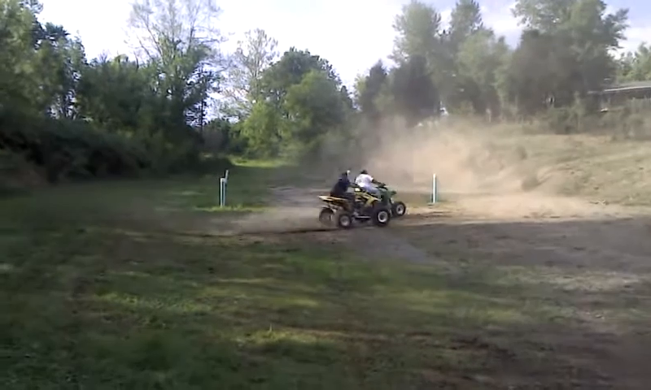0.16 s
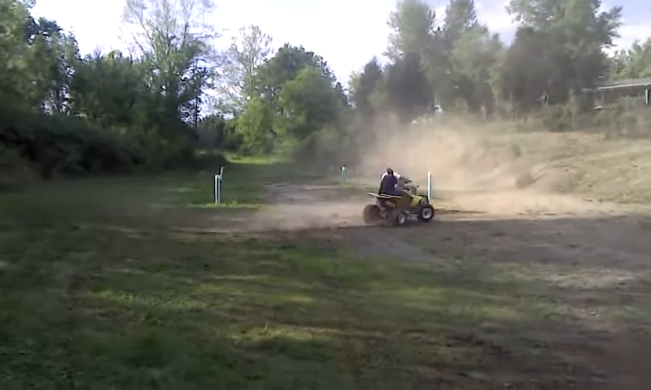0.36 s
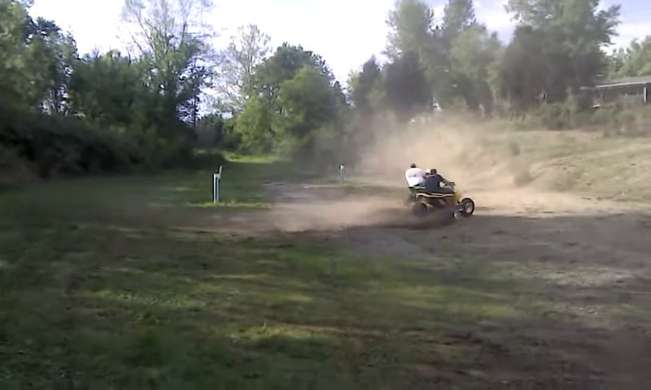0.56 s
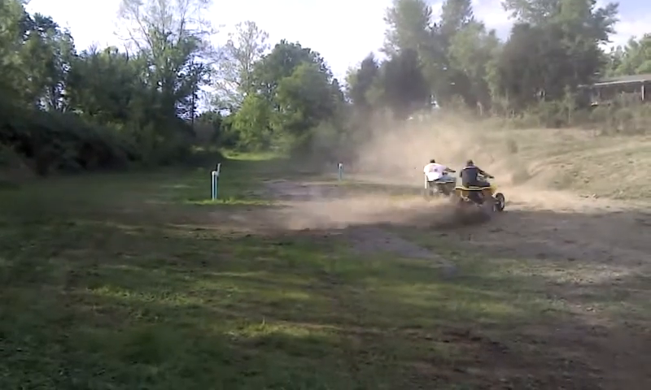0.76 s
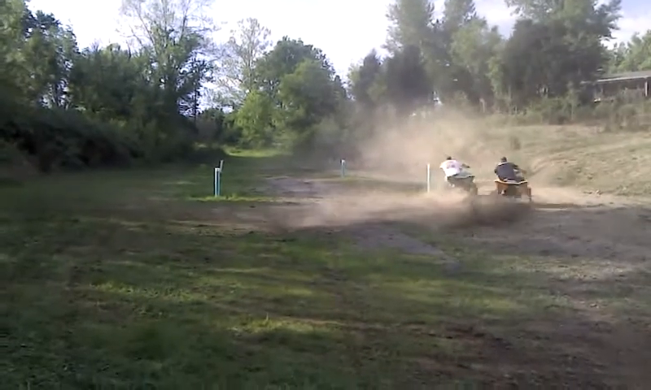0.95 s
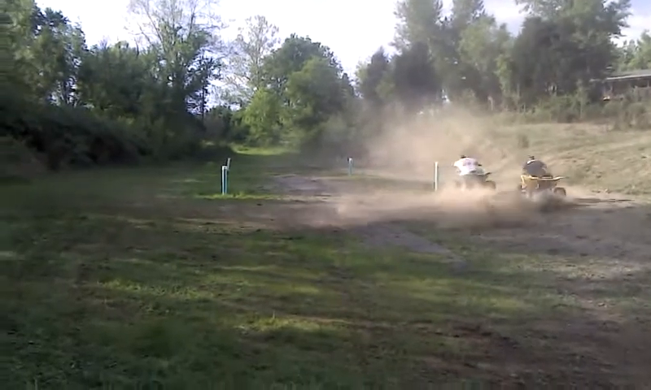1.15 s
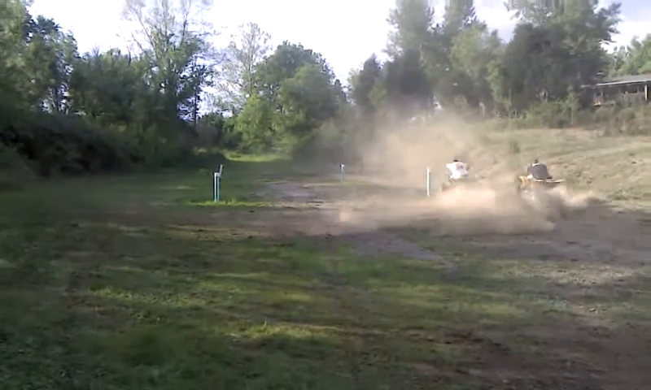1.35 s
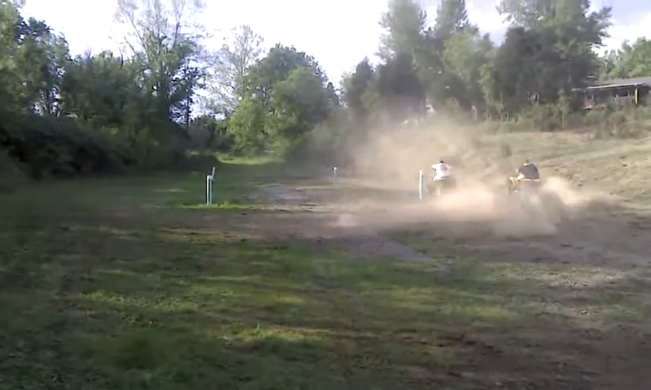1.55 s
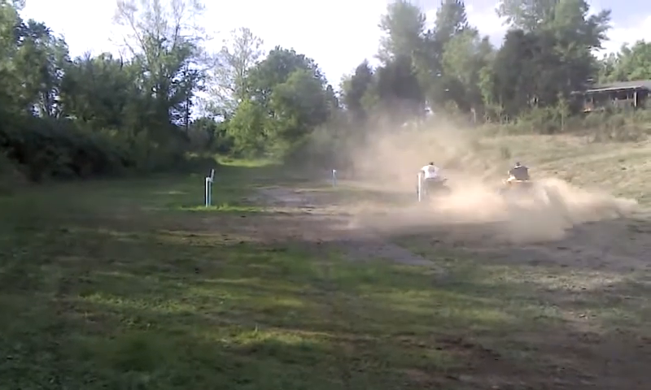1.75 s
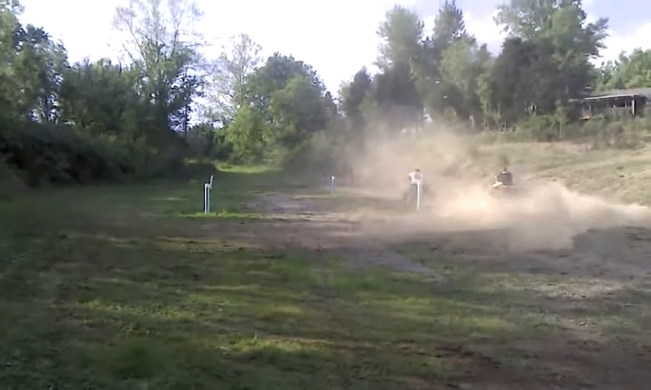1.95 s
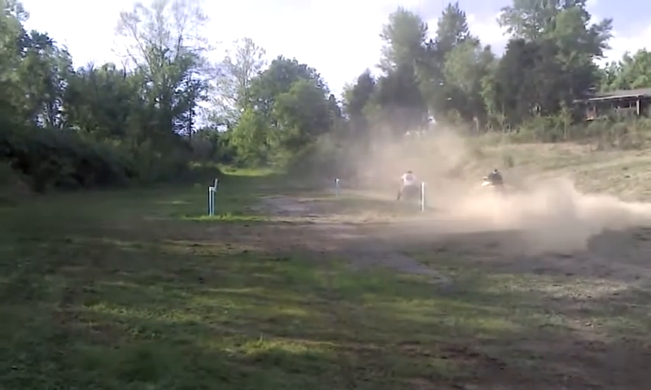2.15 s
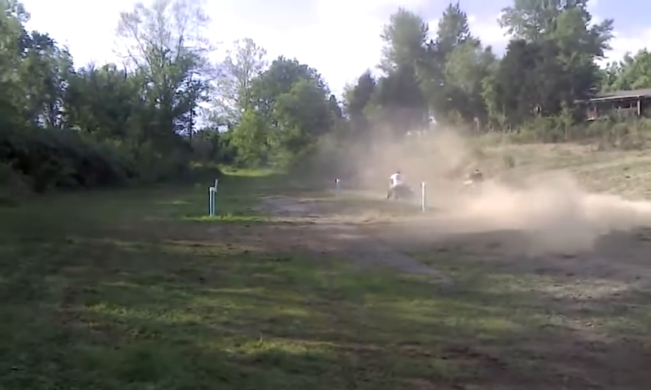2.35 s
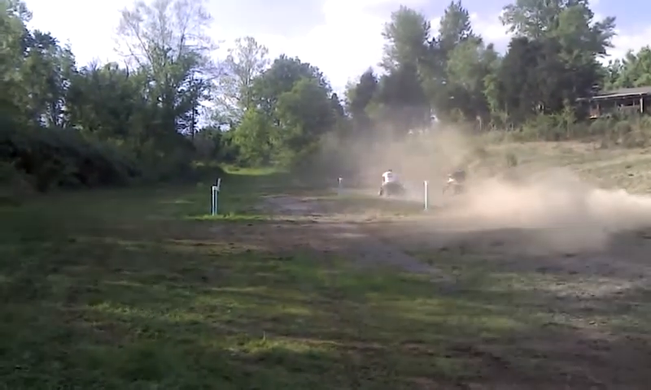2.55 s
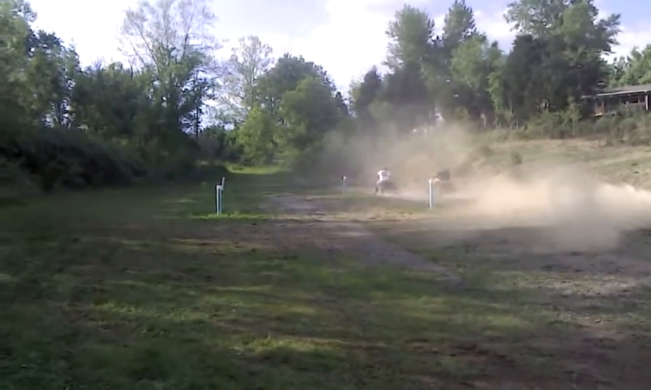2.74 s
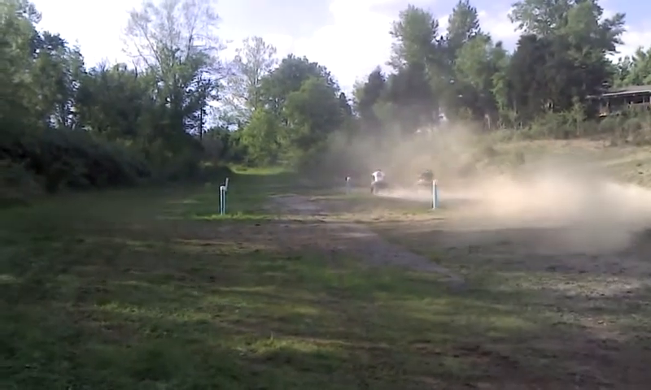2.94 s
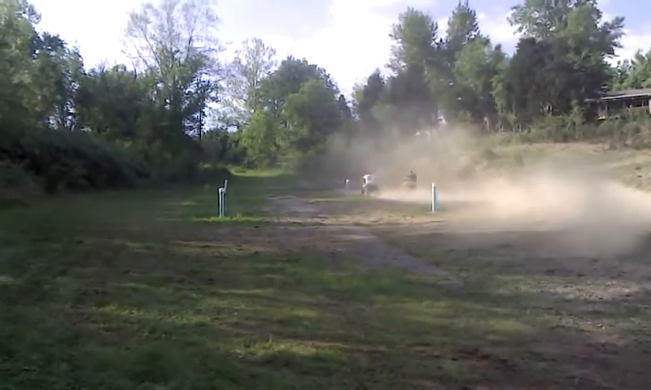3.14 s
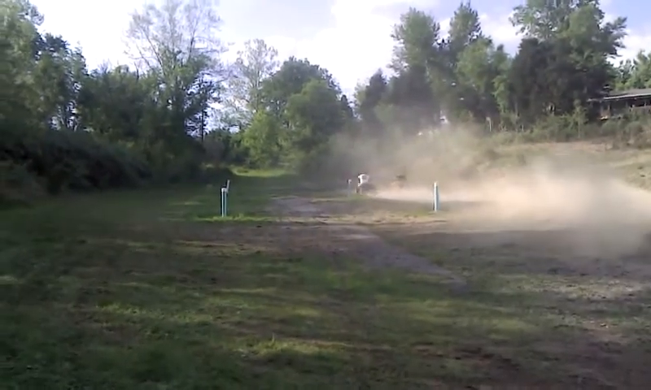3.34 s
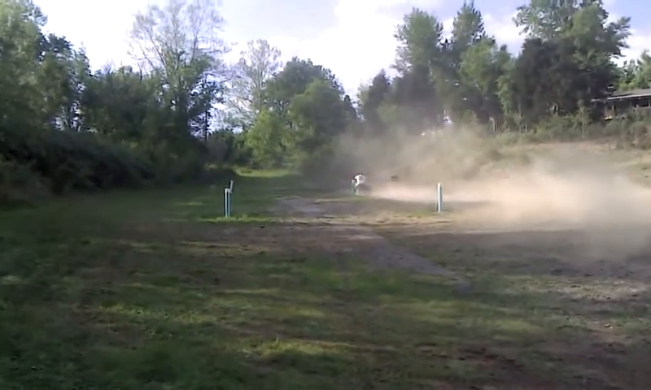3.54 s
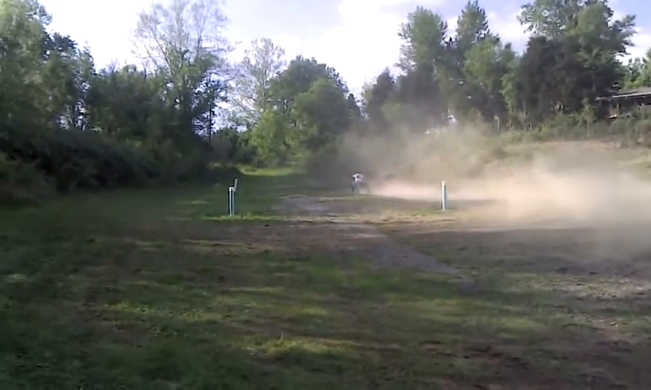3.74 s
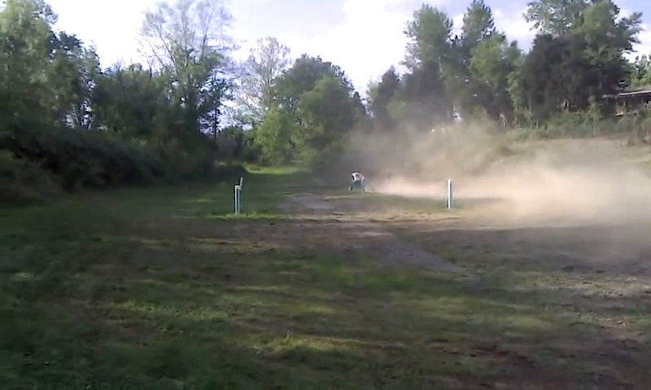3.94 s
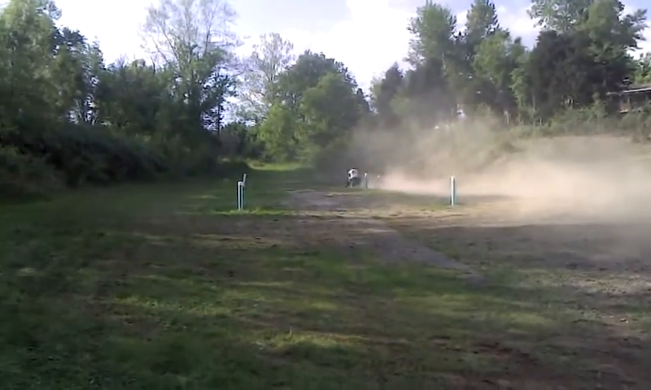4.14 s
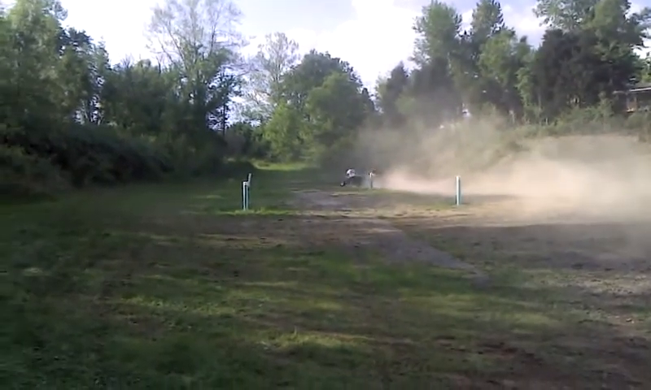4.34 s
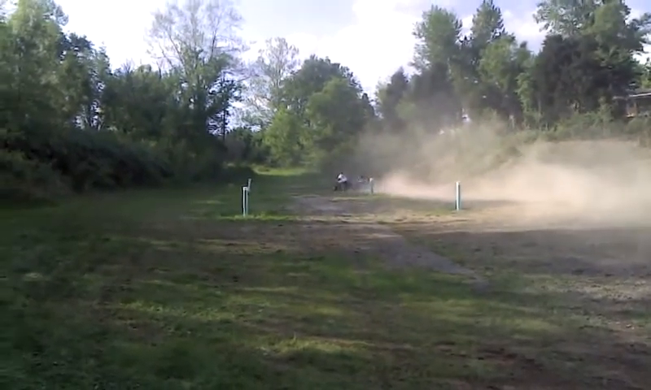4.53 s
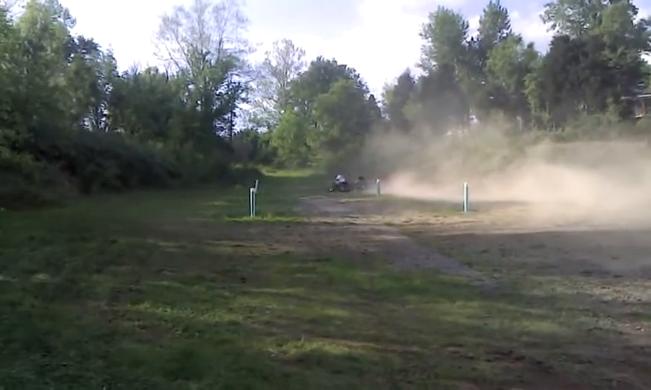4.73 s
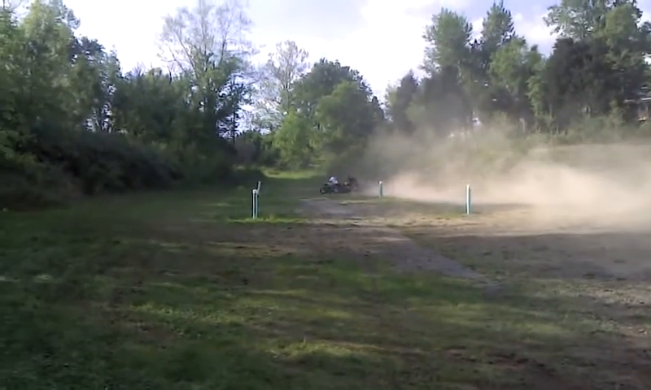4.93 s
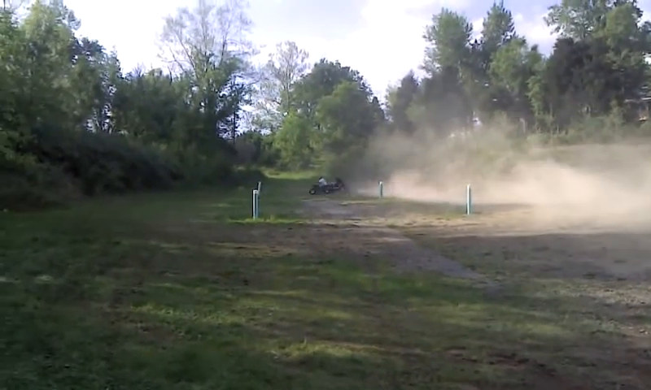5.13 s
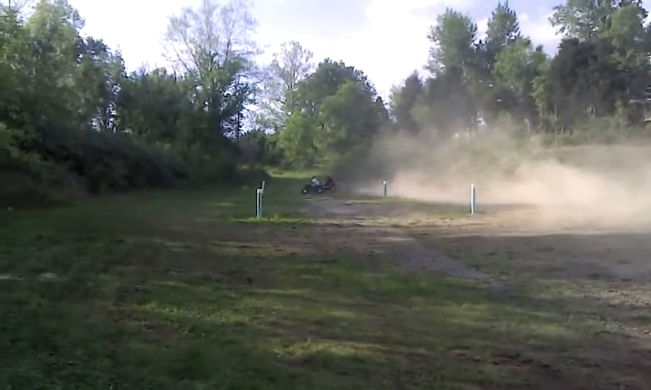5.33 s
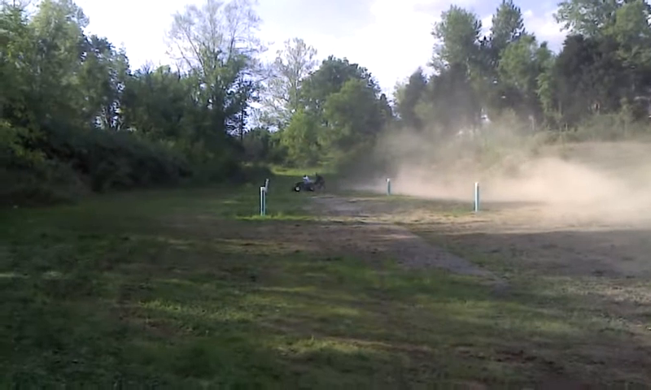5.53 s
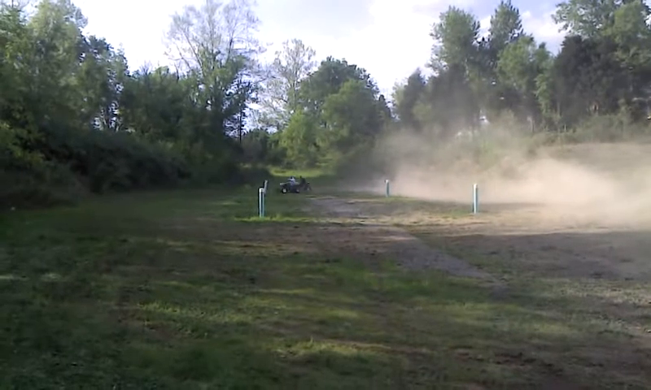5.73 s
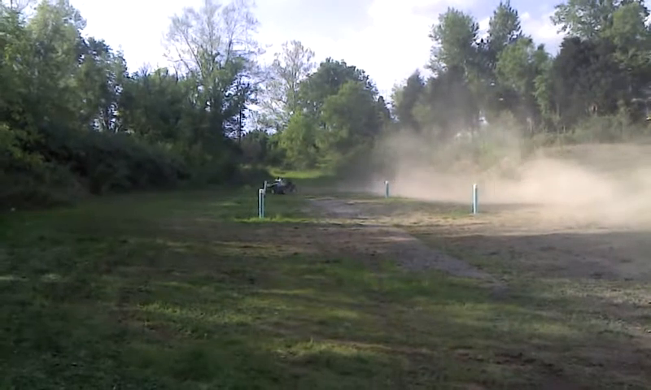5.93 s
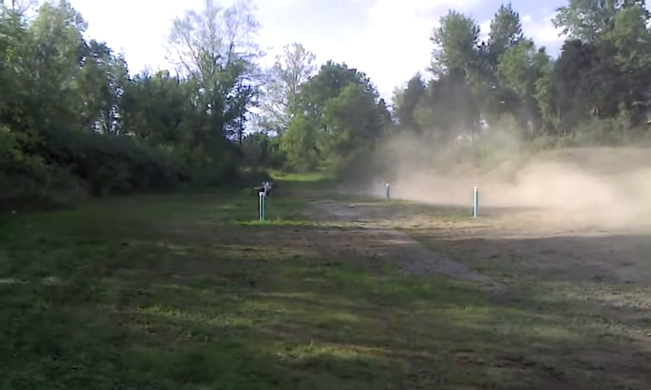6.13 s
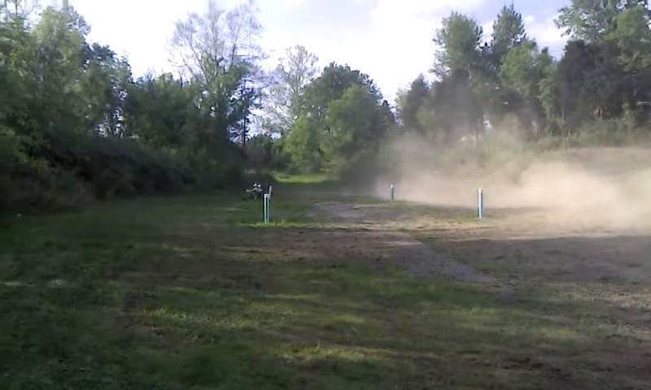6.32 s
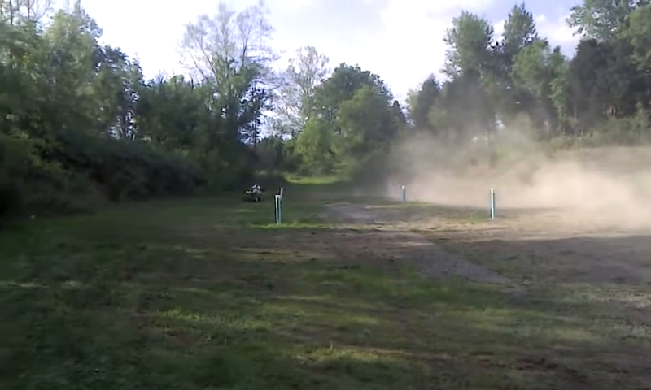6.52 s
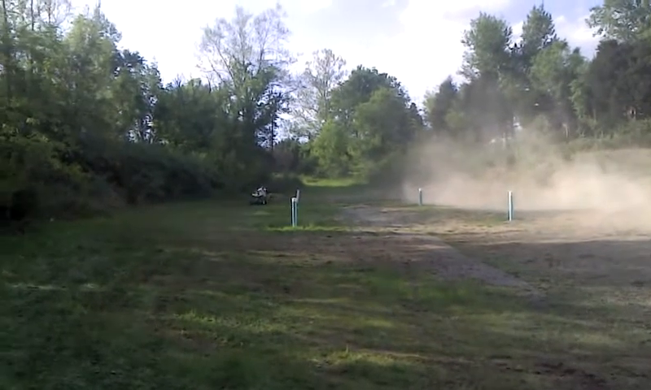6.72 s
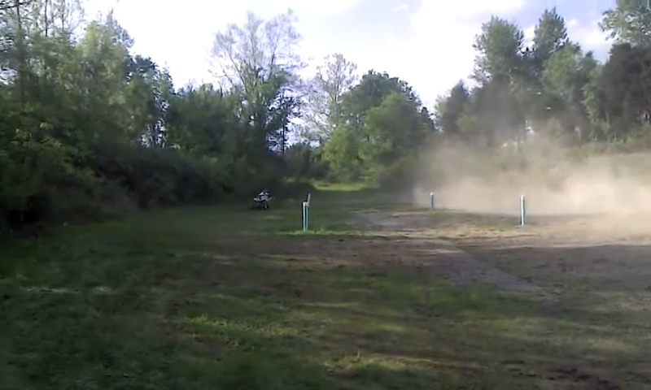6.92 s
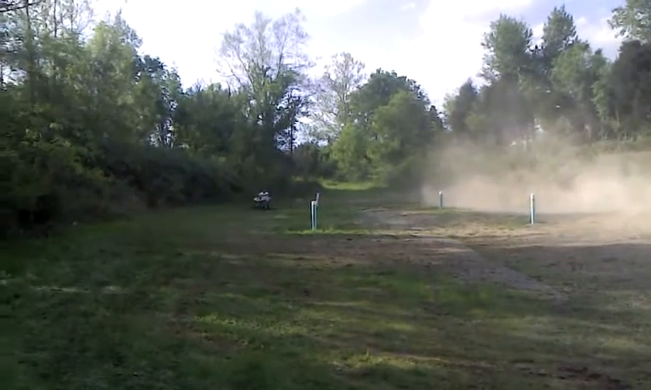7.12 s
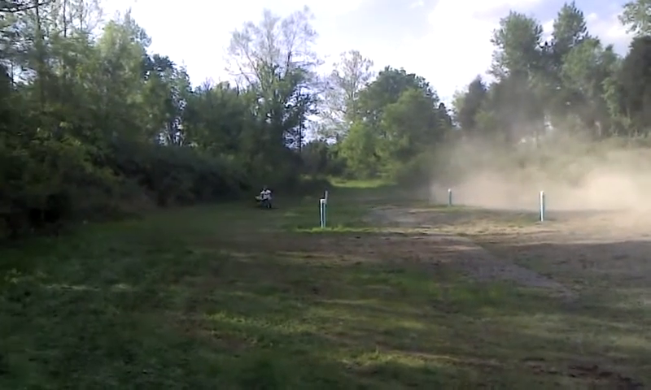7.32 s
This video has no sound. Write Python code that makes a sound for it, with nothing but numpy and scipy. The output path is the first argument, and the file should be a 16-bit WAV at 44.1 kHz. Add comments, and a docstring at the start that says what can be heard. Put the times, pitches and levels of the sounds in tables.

```python
"""Two quads racing on a dirt track

Two single-cylinder four-stroke quads race past, pull away, shut off for the far turn and open up again.
Every firing sends one pressure pulse through the muffler, with a burst of rasping gas on its front.
Chains, tyres and clanking frames rush along underneath, and the tree line echoes the quads.
A small camera microphone passes only a narrow band and flattens the tallest peaks."""
import sys
import numpy as np
from scipy import signal
from scipy.fft import rfft, irfft, next_fast_len
from scipy.io import wavfile
from scipy.ndimage import uniform_filter1d, map_coordinates

SR = 44100
rng = np.random.default_rng(int(sys.argv[2]) if len(sys.argv) > 2 else 0)


def waveform_to_disk(signal):
    """Save audio, clipped to [-1, 1], as 16-bit WAV at the path in sys.argv[1]."""
    frames = np.transpose(np.atleast_2d(signal))
    scaled = np.clip(frames, -1, 1) * 32767
    samples = np.round(scaled).astype(np.int16)
    wavfile.write(sys.argv[1], SR, samples)


N = 329868


def amp(db):
    """Turn decibels into gain."""
    return 10 ** (np.asarray(db) / 20)


def unit(x):
    """Scale x to an rms of 1."""
    return x / np.sqrt(np.mean(x ** 2) + 1e-20)


def steady(x):
    """Even x out to an rms near 1 all the way through, using a sliding half-second window."""
    window = np.hanning(SR // 2)
    power = np.abs(signal.fftconvolve(x ** 2, window, "same"))
    weight = signal.fftconvolve(np.ones(N), window, "same")
    return x / np.sqrt(power / weight + 1e-20)


def along(points, hz):
    """Read a value between (f/Hz, value) points on a log frequency axis."""
    f, v = np.transpose(points)
    return np.interp(np.log(hz + 1), np.log(f + 1), v)


def curves(rows):
    """Draw one value per sample for each column after the time."""
    s, *cols = np.transpose(rows)
    return [np.interp(np.arange(N) / SR, s, c) for c in cols]


def wobble(rate):
    """Draw a smooth random curve through a given number of random points a second."""
    knots = rng.standard_normal(int(N * rate / SR) + 4)
    return map_coordinates(knots, [np.arange(N) * rate / SR])


def filtered(x, response):
    """Multiply the spectrum of x by a response to frequency."""
    m = next_fast_len(N + SR // 2)
    return irfft(rfft(x, m) * response(np.fft.rfftfreq(m, 1 / SR)), m)[:N]


def coloured(x, spectrum):
    """Shape x by (f/Hz, level/dB) points."""
    return filtered(x, lambda hz: amp(along(spectrum, hz)))


def ringing(spectrum, size=8192):
    """Make the pulse with this spectrum that starts at once and never sounds before its cause."""
    cepstrum = irfft(np.log(amp(along(spectrum, np.fft.rfftfreq(size, 1 / SR)))))
    # folding the cepstrum onto its first half gives minimum phase
    cepstrum[1:size // 2] *= 2
    cepstrum[size // 2 + 1:] = 0
    return irfft(np.exp(rfft(cepstrum)))


# bumpy stretches where the revs hunt up and down
# (start t/s, end t/s, period t/s, swing of first and of second quad as a share of speed)
BUMPY_STRETCHES = [(0.736, 1.398, .33, .028, .004), (5.021, 6.1, .55, .035, .03),
                   (6.559, 7.473, .365, .036, .022)]


def hunting():
    """Over bumps the rear wheels slip and grip in turn, which swings the speed of each engine."""
    t = np.arange(N) / SR
    total = 1
    for start, end, period, *swings in BUMPY_STRETCHES:
        swing = np.sin(2 * np.pi * (t - start) / period) * (t > start) * (t < end)
        total = total + np.outer(swings, swing)
    return total


# engine speed before the bumps: the higher-revving quad (t/s, firings a second)
HIGH_REV_SPEED = [(0, 42.2), (.27, 41.8), (.44, 48.8), (.65, 47.6), (.76, 53.6), (1.45, 52), (1.68, 59.7),
                  (1.86, 57.2), (2.02, 62), (2.48, 62), (2.7, 65.2), (2.93, 50.3), (3.23, 48), (3.42, 47.3),
                  (3.75, 45.1), (4.38, 39), (4.78, 32.5), (5.1, 36), (5.5, 34.5), (5.98, 35.7),
                  (6.22, 43.2), (6.5, 42.2), (6.65, 44.3), (7.48, 43.8)]
# the same for the quad in a taller gear (t/s, firings a second)
TALL_GEAR_SPEED = [(0, 37.56), (.44, 39.18), (.56, 34.02), (.76, 34.95), (.9, 41.86), (1.25, 43.06),
                   (1.48, 36.66), (1.8, 34.6), (2.05, 41.79), (2.45, 43), (2.78, 46.84), (3, 36.83),
                   (3.22, 38.7), (3.75, 35.18), (4.7, 30.07), (5.05, 36), (5.95, 36.5), (6.3, 41.37),
                   (7.48, 44.56)]


def engine_speeds():
    """Each engine follows its own speed curve, swung up and down by the bumps."""
    return np.array(curves(HIGH_REV_SPEED) + curves(TALL_GEAR_SPEED)) * hunting()


def firings(speed, scatter_db, jitter_s, waver):
    """An engine gives one impulse per firing, each a little off in time and strength."""
    rate = speed * (1 + waver * wobble(14))
    turns = np.cumsum(rate) / SR + rng.random()
    at = np.flatnonzero(np.diff(np.floor(turns)))
    chance = rng.standard_normal((len(at), 2))
    shift = np.round(jitter_s * SR * chance[:, 0]).astype(int)
    return np.bincount(np.clip(at + shift, 0, N - 1), amp(scatter_db * chance[:, 1]), N)


# the pair pulls away, shuts off, turns and comes back (t/s, shared exhaust level/dB, throttle 0-1)
DRIVE_PATH = [(0, -22.5, 0.82), (.19, -23, 0.81), (.44, -15.5, 1), (.9, -18, 0.93), (1.85, -18, 0.95),
              (2.1, -20.5, 1), (2.8, -20.5, 0.87), (2.88, -21, 0.34), (2.98, -27, .52), (3.27, -27, 0.44),
              (3.75, -25, 0.15), (4.25, -26.5, 0.28), (4.58, -27, .02), (4.86, -34.5, .45), (5.1, -33, .44),
              (5.3, -37, 0.53), (5.9, -33.5, .6), (6.25, -32.5, .88), (6.85, -29.5, 0.71),
              (7.48, -32, 0.89)]


def exhaust_level():
    """The shared exhaust level in dB, falling and rising as the pair goes and comes."""
    return curves(DRIVE_PATH)[0]


def throttle():
    """How far the throttles are open, 0-1."""
    return np.clip(curves(DRIVE_PATH)[1], 0, 1)


SHUT, OPEN = .3, 0.92  # throttle at or below which the engines coast, and from which they pull fully


def load():
    """How hard the engines pull, from 0 coasting to 1 driving."""
    return np.clip((throttle() - SHUT) / (OPEN - SHUT), 0, 1)


NEAR_DB, FAR_DB = -21, -33.5  # exhaust level of the quads close by and at the far turn


def by_distance(near, far):
    """A value that moves from near to far as the quads grow fainter."""
    return near + (far - near) * np.clip((NEAR_DB - exhaust_level()) / (NEAR_DB - FAR_DB), 0, 1)


# which way the quads point
# (t/s, share heading this way with the intakes in front, share seen from straight behind)
VIEWS = [(0, .05, 0.008), (1.4, 0, 0.11), (2.1, 0.013, 0.54), (2.65, 0.17, 0.87), (4.65, 0.026, 1),
         (4.95, .92, .3), (6, 0.99, .1), (7.48, 0.6, .2)]


def view():
    """The shares heard from the front and from straight behind, each 0-1."""
    return np.clip(curves(VIEWS), 0, 1)


# how much louder the first quad is than the second (t/s, level/dB)
FIRST_QUAD_LEAD = [(0, 0), (.5, 3), (2.4, 1), (3.3, 0.5), (4, 2), (4.9, -4), (5.6, 4.5), (6.3, 4),
                   (7.48, 7)]
JOLT_DB, JOLTS_PER_S = 0.4, 6  # size and pace of the wavering in each quad's level


def quad_shares():
    """Each quad's part of the exhaust level in dB; rough ground makes it waver."""
    lead = amp(curves(FIRST_QUAD_LEAD)[0])
    whole = np.hypot(1, lead)
    return [20 * np.log10(part / whole) + JOLT_DB * wobble(JOLTS_PER_S) for part in (lead, 1)]


BARK_OPEN_DB, BARK_SHUT_DB = 0.42, -17  # pulse front against its boom, at full and at closed throttle


def bark_level(boom_db):
    """The wider the throttle, the steeper and louder the front of each pulse."""
    return boom_db + BARK_SHUT_DB + (BARK_OPEN_DB - BARK_SHUT_DB) * throttle()


# colour of one driving pulse through the first quad's muffler (f/Hz, relative level/dB)
FIRST_PIPE = [(30, -45.5), (55, -15), (85, -3.5), (112, 1), (170, -3.5), (245, -2.5), (300, -2.5),
              (360, -2.5), (425, -6), (480, -9.5), (560, -30), (800, -37.5), (1500, -49)]
# the same for the second quad (f/Hz, relative level/dB)
SECOND_PIPE = [(30, -52.5), (55, -15.5), (78, -4), (125, 1), (165, -0.5), (230, 0), (300, -6), (385, -7.5),
               (450, -12), (540, -27.5), (800, -33.5), (1500, -53.5)]
# one pulse of either quad with the throttle shut (f/Hz, relative level/dB)
COASTING_PULSE = [(30, -43), (60, -17.5), (85, -5), (125, 5.5), (165, -2.5), (210, -4), (255, -9),
                  (295, -12.5), (340, -20), (420, -28.5), (490, -38.5), (1500, -73.5)]
# one pulse of either quad heard from the front (f/Hz, relative level/dB)
ONCOMING_PULSE = [(30, -40), (55, -15.5), (78, 4), (90, 0), (108, -8), (138, 5), (165, -2.5), (200, -3.5),
                  (255, 1), (320, -1), (390, -6), (460, -14), (560, -27.5), (1500, -52)]


def exhaust(pulses, pipe, share_db, split_hz):
    """The muffler booms at every pulse; an open throttle steepens the front into a bark."""
    boom_db = exhaust_level() + share_db
    oncoming, _ = view()
    driving = (1 - oncoming) * load()
    coasting = 1 - oncoming - driving
    mixture = ((driving, pipe), (coasting, COASTING_PULSE), (oncoming, ONCOMING_PULSE))
    wave = -sum(signal.fftconvolve(pulses * share, ringing(shape))[:N] for share, shape in mixture)
    # the boom lies below the split, the bark is what remains
    boom = filtered(wave, lambda hz: 1 / (1 + (hz / split_hz) ** 12))
    bark = wave - boom
    return amp(boom_db) * steady(boom) + amp(bark_level(boom_db)) * steady(bark)


def gas_flow(pulses, share_db, rise_s, fall_s):
    """Gas leaves the tailpipe in one short puff per firing."""
    t = np.arange(SR // 20) / SR
    puff = (1 - np.exp(-t / rise_s)) * np.exp(-t / fall_s)
    return amp(share_db) * steady(signal.fftconvolve(pulses, puff)[:N])


def pipe_crack(pulses, share_db, decay_s):
    """Each pulse front is scattered the same way along the pipe, which smears it without colouring it."""
    t = np.arange(SR // 50) / SR
    scatter = rfft(rng.standard_normal(len(t)) * t * np.exp(-t / decay_s))
    rattle = irfft(np.exp(1j * np.angle(scatter)))  # keep only the phase
    return amp(share_db) * steady(signal.fftconvolve(pulses, rattle)[:N])


# colour of the throaty rasp (f/Hz, relative level/dB per Hz)
THROAT_COLOUR = [(250, -30), (480, -0.5), (590, -3.5), (780, -7), (900, -1), (1060, 3.5), (1250, -0.5),
                 (1450, -1.5), (1700, -13), (2200, -38.5)]
# the throaty rasp is hollower from straight behind (f/Hz, relative level/dB per Hz)
HOLLOW_COLOUR = [(250, -32.5), (480, 2.5), (590, -3), (770, 3), (920, 0.5), (1080, -2.5), (1300, -5),
                 (1500, -5), (1700, -10), (2200, -37.5)]
# colour of the jet, higher up (f/Hz, relative level/dB per Hz)
JET_COLOUR = [(1200, -37), (1600, -9), (1850, 2), (2080, 3.5), (2400, -3), (2650, -23.5), (3200, -50.5)]
# colour of the sizzle, highest of all (f/Hz, relative level/dB per Hz)
SIZZLE_COLOUR = [(1900, -40), (2400, -6.5), (2600, -0.5), (2900, -0.5), (3100, -6), (3350, -10.5),
                 (3750, -15.5), (4300, -28)]
# gas noise against the bark, one row each for throaty rasp, jet and sizzle
# (level/dB at cruising speed, level/dB more per extra firing a second, level/dB more from the front,
# level/dB more inside its beam under load, share from behind where the beam points)
GAS_LEVELS = [(-18, 0.2459, -2, 0.5, 0.68), (-21, 0.2845, -3.5, 7.5, 0.54), (-26, 0.1933, 1, 13, 0.76)]
CRUISE_RATE = 45  # firings a second
BLUR_NEAR, BLUR_FAR = .3, 0.94  # steady flow added to the puffs, which have an rms near 1
BEAM_WIDTH = 0.31  # in shares of the view from behind


def rasp(flow, crack, speed, throat_crack, jet_crack):
    """Turbulence follows the puffs and crack, grows with revs, beams backwards and blurs with distance."""
    between = np.abs(by_distance(BLUR_NEAR, BLUR_FAR))
    oncoming, behind = view()
    gas = steady((flow + between) * rng.standard_normal(N))
    crack = steady(crack) * np.exp(-2 * between)
    low = gas + throat_crack * crack
    high = gas + jet_crack * crack
    throat = steady((1 - behind) * coloured(low, THROAT_COLOUR) + behind * coloured(low, HOLLOW_COLOUR))
    jet = steady(coloured(high, JET_COLOUR))
    sizzle = steady(coloured(high, SIZZLE_COLOUR))
    bark_db, pull = bark_level(exhaust_level()), load()
    total = 0
    for layer, (cruise_db, rev_db, front_db, beam_db, aim) in zip((throat, jet, sizzle), GAS_LEVELS):
        beam = pull * np.exp(-((behind - aim) / BEAM_WIDTH) ** 2)
        level_db = bark_db + cruise_db + rev_db * (speed - CRUISE_RATE)
        total = total + amp(level_db + front_db * oncoming + beam_db * beam) * layer
    return total


def patchy(x, depth_db, size=512):
    """Swinging tailpipes and bumpy ground make patches of the gas noise swell and fade."""
    z = signal.stft(x, nperseg=size)[2]
    across_pitch = uniform_filter1d(rng.standard_normal(z.shape), size=5, axis=0)
    field = uniform_filter1d(across_pitch, size=13, axis=1)
    return signal.istft(z * amp(depth_db * unit(field)), nperseg=size)[1][:N]


# colour of chains, valve gear and tyres (f/Hz, relative level/dB per Hz)
RUNNING_COLOUR = [(40, -0.5), (90, 8.5), (300, 4.5), (560, 3), (780, 2.5), (1100, -5.5), (1600, -7),
                  (2130, 2), (2600, -8), (3100, -0.5), (3700, -4.5), (4300, -18)]
# how loud they are along the way (t/s, level/dB)
RUNNING_LEVEL = [(0, -50.5), (.5, -44.5), (2.7, -41.5), (3, -57), (4.2, -56), (4.7, -62), (5.2, -64.5),
                 (5.6, -58.5), (6.3, -55.5), (7.48, -50.5)]


def running_gear(flutter_db, clank_db, clanks_per_s, frame_hz, decay_s):
    """An unsteady rush of chains and tyres; ruts make the steel frames clank."""
    rush = amp(flutter_db * wobble(30)) * unit(coloured(rng.standard_normal(N), RUNNING_COLOUR))
    knocks = (rng.random(N) < clanks_per_s / SR) * amp(3.7 * rng.standard_normal(N))
    t = np.arange(SR // 20) / SR
    swell = signal.fftconvolve(knocks, t * np.exp(-t / decay_s))[:N]
    pitch = frame_hz * (1 + 0.03 * wobble(60))
    clanks = unit(swell * np.sin(2 * np.pi * np.cumsum(pitch) / SR))
    return amp(curves(RUNNING_LEVEL)[0]) * (rush + amp(clank_db) * clanks)


# how long the trees' answer takes to fall by 60 dB (f/Hz, t/s)
TREE_DECAY = [(100, 0.43), (500, 0.35), (4000, 0.13)]


def tree_line(x, delay_s):
    """The trees give a diffuse late answer whose treble dies first."""
    hz, t, z = signal.stft(rng.standard_normal(SR // 2), SR, nperseg=256)
    fade = amp(-60 * t / along(TREE_DECAY, hz)[:, None])
    tail = signal.istft(z * fade, SR, nperseg=256)[1]
    late = np.pad(x, (int(abs(delay_s) * SR), 0))
    return signal.fftconvolve(late, tail / np.linalg.norm(tail))[:N]


WET_NEAR_DB, WET_FAR_DB = -12, -6.5  # tree line answer against the direct sound


def roaming_echo(x, drift_rate, count=3):
    """As the quads move, the paths by way of the trees keep changing."""
    weights = np.array([wobble(drift_rate) for _ in range(count)])
    weights /= np.sqrt(np.sum(weights ** 2, axis=0) + 0.066)
    answer = sum(tree_line(x * w, delay_s=.03) for w in weights)
    return amp(by_distance(WET_NEAR_DB, WET_FAR_DB)) * answer


def scene():
    """Both quads, their gas noise, their running gear and the echo from the trees."""
    first_speed, second_speed = engine_speeds()
    first_db, second_db = quad_shares()
    first = firings(first_speed, scatter_db=.9, jitter_s=.00003, waver=.004)
    second = firings(second_speed, scatter_db=1.44, jitter_s=.00008, waver=.006)
    pipes = exhaust(first, FIRST_PIPE, first_db, split_hz=213.0)
    pipes = pipes + exhaust(second, SECOND_PIPE, second_db, split_hz=234)
    first_flow = gas_flow(first, first_db, rise_s=0.0035, fall_s=0.0023)
    second_flow = gas_flow(second, second_db, rise_s=0.0031, fall_s=0.0025)
    flow = steady(np.hypot(first_flow, second_flow))
    crack = pipe_crack(first, first_db, decay_s=.0013)
    crack = crack + .7 * pipe_crack(second, second_db, decay_s=0.0018)
    # the first quad's revs set the level of all the gas noise
    gas = rasp(flow, crack, first_speed, throat_crack=2.8, jet_crack=1.1)
    quads = amp(-0.68) * pipes + patchy(gas, depth_db=2.5)
    gear = running_gear(flutter_db=3.5, clank_db=-12.5, clanks_per_s=5.5, frame_hz=2040, decay_s=0.0034)
    return (quads + roaming_echo(quads, drift_rate=4) + gear)[None]


BAND_HZ = 4285 - 150  # the steep edge of the microphone's narrow band
TOP_HZ = 15848  # nothing passes from here up, not even the buzz of flattened peaks


def record(dry):
    """The camera microphone hears a narrow band and flattens the tallest peaks."""
    narrow = filtered(dry[0], lambda hz: 1 / np.sqrt(1 + (hz / BAND_HZ) ** 70))
    flattened = np.clip(narrow, -.71, .71)
    return filtered(flattened, lambda hz: hz < TOP_HZ)[None]


dry = scene()
out = record(dry)
waveform_to_disk(out)
```